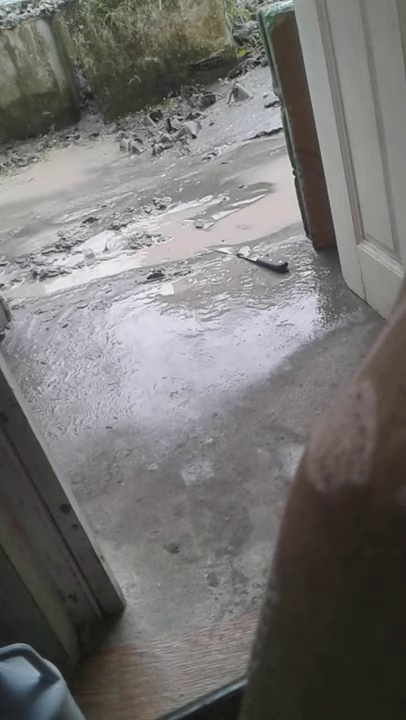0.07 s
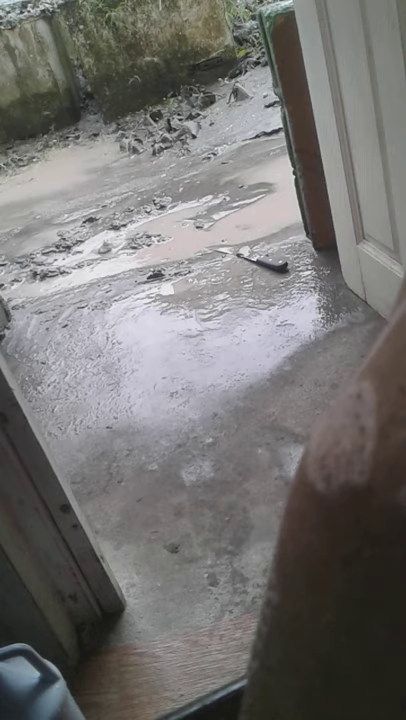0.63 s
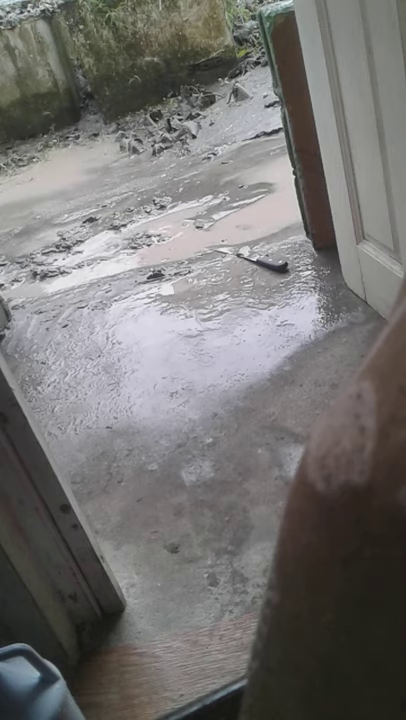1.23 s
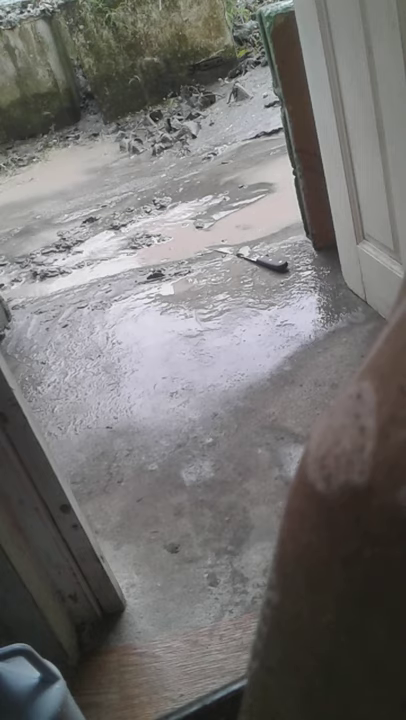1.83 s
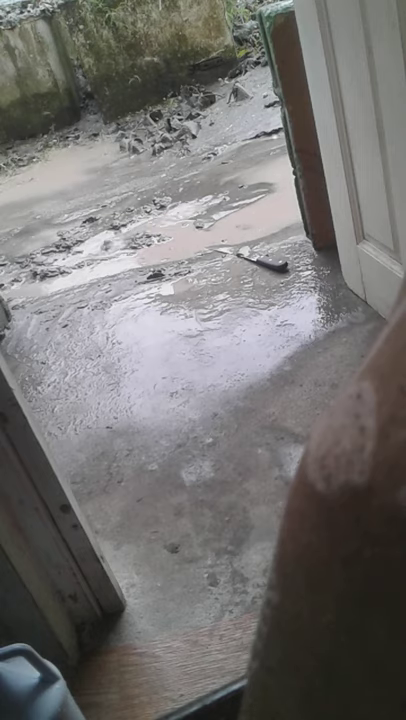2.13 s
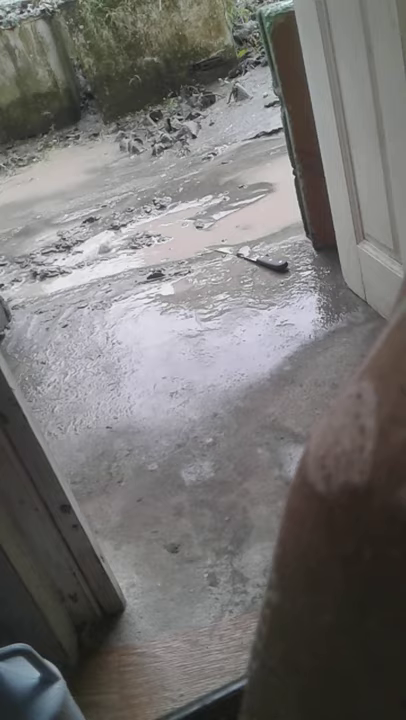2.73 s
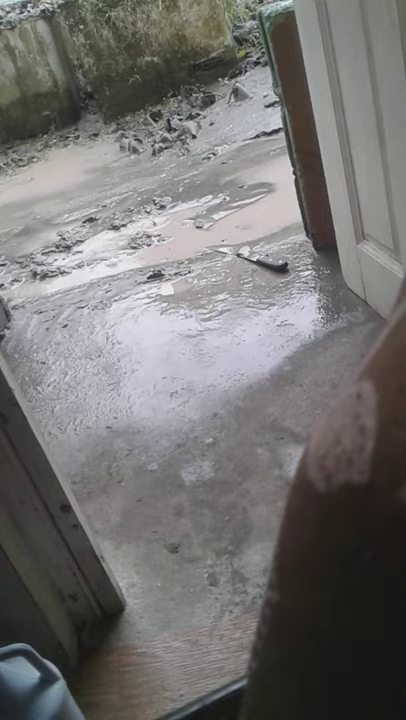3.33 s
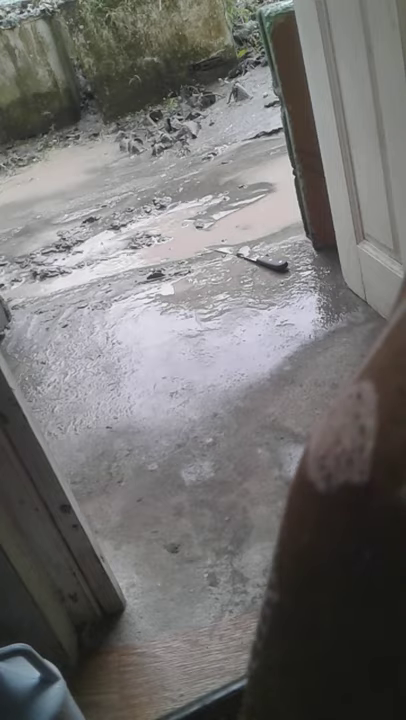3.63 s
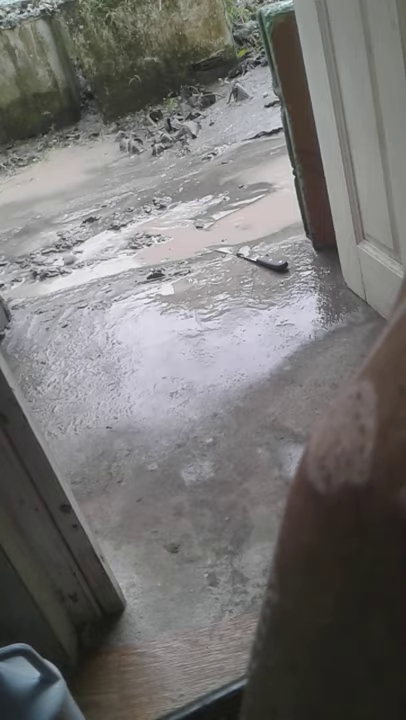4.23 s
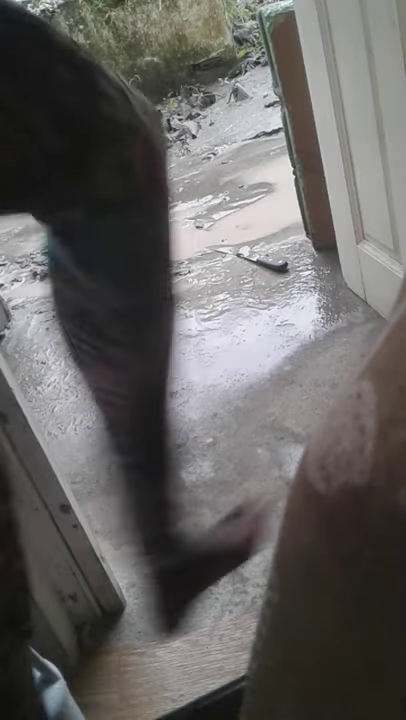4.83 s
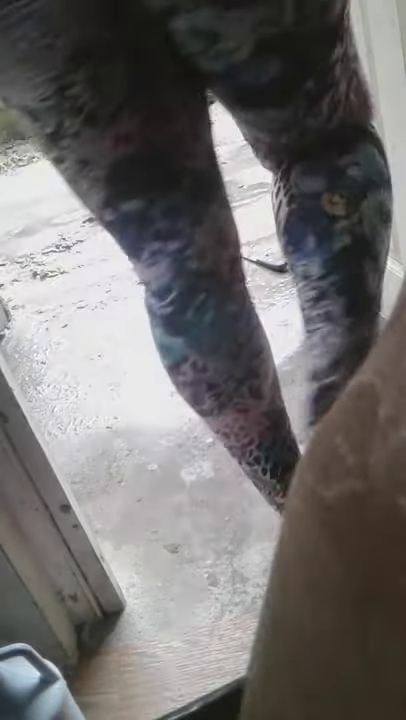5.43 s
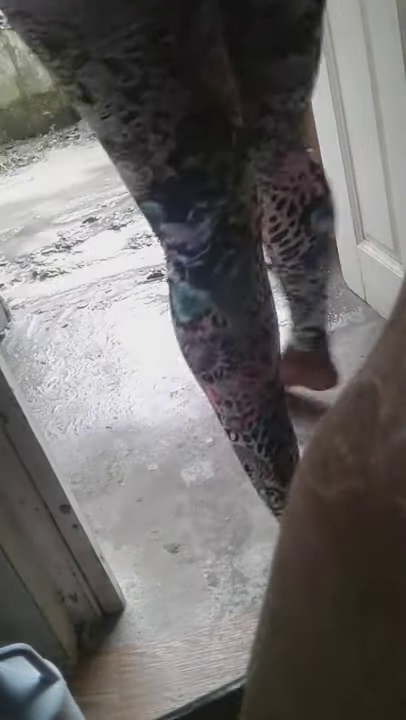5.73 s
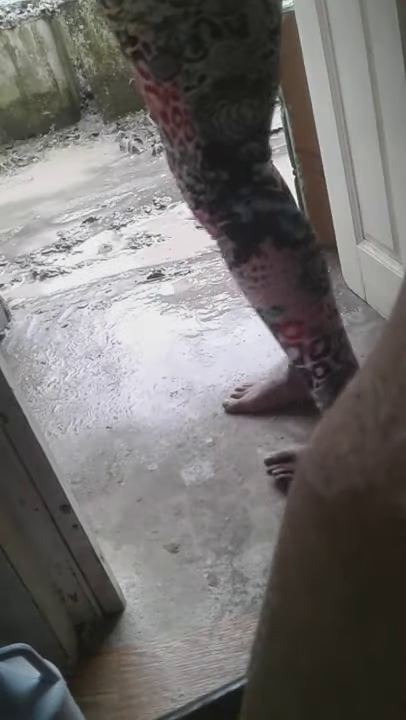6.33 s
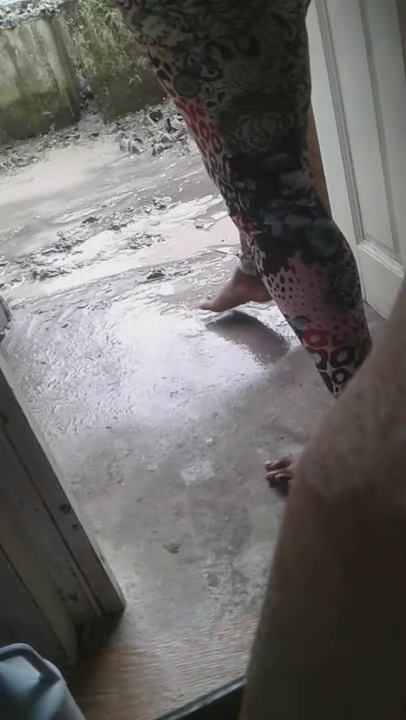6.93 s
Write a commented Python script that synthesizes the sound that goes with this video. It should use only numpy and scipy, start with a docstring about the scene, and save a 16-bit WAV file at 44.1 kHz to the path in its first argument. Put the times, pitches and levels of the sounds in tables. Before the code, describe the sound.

A quiet outdoor rumble and thin hiss drift into a small wooden-floored room through an open door. After a light, dry tick, two dull footsteps land on the boards, the second louder and joined by another tick, each briefly booming in the room. Faint barefoot pats and soft scuffs of cloth follow as the walker passes. The single microphone's hiss swells slightly with the thumps.

```python
"""Two footfalls by an open door

A small wooden-floored room, one microphone, the door open on a wet yard: outdoor rumble and thin hiss.
Two dull steps land heel then sole; the boards ring and the room booms briefly. The walker pads on
barefoot into the doorway, screening the yard. In the room, light ticks and soft scuffs and rustles;
far off, faint tones. The recorder's noise suppressor lets the hiss up while the thumps last."""
import sys
import numpy as np
from scipy import signal
from scipy.fft import rfft, irfft, next_fast_len
from scipy.io import wavfile
from scipy.ndimage import uniform_filter1d

SR = 44100
rng = np.random.default_rng(int(sys.argv[2]) if len(sys.argv) > 2 else 0)


def to_wav(s):
    """Save 16-bit WAV."""
    ch = np.atleast_2d(s).T  # columns
    pcm = np.round(np.clip(ch, -1, 1) * 32767)  # PCM
    wavfile.write(sys.argv[1], SR, pcm.astype(np.int16))


N = 317079

# Colour of the yard's rumble and the microphone's hiss: frequency_hz, relative_density_db
AIR_SPECTRUM = [(25, -24), (34, -24.5), (45, -11.5), (62, -2), (140, -1), (260, -5.5), (410, -10),
                (660, -12.5), (1000, -16.5), (2000, -24.5), (3200, -32), (5000, -39), (7500, -35.5),
                (15500, -35.5)]
# Skin and cloth brushing by: peak_s, level_db, centre_hz, fall_s
SCUFF_STROKES = [(.12, -77, 1300, 0.018), (.53, -82, 3280, 0.052), (.572, -69, 1010, .055),
                 (.645, -72, 1180, .05), (1.29, -79, 1330, 0.026), (2.953, -69.5, 760, 0.021),
                 (3.48, -76, 1100, 0.035), (4.66, -71, 920, 0.097), (5.09, -68.5, 600, 0.055),
                 (5.33, -75, 960, 0.13), (5.485, -66.5, 730, 0.067), (5.709, -76, 885, 0.057)]
# Slow rustles and low swells: peak_s, level_db, centre_hz, fall_s
RUSTLE_STROKES = [(.27, -83, 1800, .08), (.72, -71.5, 64.7, 0.2), (1.52, -81.5, 1500, .17),
                  (2.3, -74, 70.5, .2), (3.8, -83.5, 2750, 0.067), (6.29, -75.5, 357, .08),
                  (6.85, -85, 2000, 0.23)]
# Faint tones, far off: start_s, level_db, pitch_hz, hold_s
FAR_TONES = [(1.386, -83, 2560, .012), (2.399, -71.5, 950, 0.028), (4.021, -74, 1290, 0.048),
             (4.63, -72, 1270, 0.12), (5.28, -77, 1190, 0.099)]
# Light, dry ticks in the room: start_s, level_db, pitch_ratio, relative_echo_db
TICK_HITS = [(1.833, -74, 1.6, 0), (2.9735, -46, 1.02, -7.5), (4.2985, -43.5, 1.02, -7)]
# What a tick rings with at a pitch ratio of 1: pitch_hz, relative_db
TICK_PARTIALS = [(1400, -12), (2350, -1), (3300, -5.5)]
# How long the small room takes to die away: frequency_hz, t60_s
ROOM_DECAY = [(70, 0.64), (160, 0.37), (300, 0.37), (700, 0.41), (1300, 0.39), (3000, 0.5), (8000, 0.26)]
# Heavy steps, each at a place between spots 0 and 1 on the floor:
# start_s, place, thud_hz, thud_db, ring_gain_db, boom_gain_db, sole_delay_s, sole_gain_db
HEAVY_STEPS = [(3.7209, 0.02, 505, -44, -2.5, -2, .0085, -5.5), (4.3362, 0.98, 751, -33, -2, -1, .0312, -2)]
# Partials of the heel's thud: pitch_ratio, relative_db, peak_s
HEEL_PARTIALS = [(0.432, 4, 0.013), (1, -2.5, 0.011), (2.45, -14.5, .012)]
# Modes of the floorboards: pitch_hz, spot_0_db, spot_1_db, t60_s
FLOOR_MODES = [(70.4, -62, -54.5, 0.62), (143.3, -55.5, -45.5, 0.42), (169.5, -47, -60, 0.32),
               (196.5, -58.5, -48, 0.92), (226.7, -47.5, -47, 0.58), (259, -42.5, -46, 0.19),
               (288, -45, -31, 0.17), (319.6, -50.5, -45, 0.25), (358.7, -54, -44, 0.41),
               (412.2, -59, -39.5, 0.27), (517, -36, -39.5, 0.14), (550, -48.5, -45.5, 0.42),
               (616, -45, -36.5, 0.41), (686, -60, -35.5, 0.15), (758, -47, -57, 0.35),
               (784, -52, -42, 0.19), (864, -45.5, -44, 0.42), (935, -54, -49.5, .3),
               (1162, -54.5, -40, 0.44), (1213, -66, -45, 0.32), (1276, -64.5, -44, 0.17),
               (1274, -63.5, -45.5, 0.31), (1820, -72, -57.5, 0.21)]
# Colour of the room's boom: frequency_hz, spot_0_relative_db, spot_1_relative_db
BOOM_SPECTRUM = [(29.8, -27, -47), (64.6, -8, -12.5), (110, -7, -13), (210, -0.5, -4), (337, 0.5, 4.5),
                 (445, 2.5, -9.5), (730, 3, 4.5), (1040, -4, -8), (1243, -9, 2), (1500, -15.5, -11),
                 (1907, -22, -16.5), (2490, -30, -32), (3740, -46, -37), (5960, -53, -51.5),
                 (12100, -60, -73)]
# Bare feet on the way to the door: start_s, knock_db, thump_db
BAREFOOT_PATS = [(4.841, -66.5, -81), (5.119, -58.5, -62.5), (5.155, -64.5, -63.5), (6.341, -85, -66.5)]


def amp(db):
    """Decibels to gain."""
    return 10 ** (np.asarray(db) / 20)


def curve_at(points, hz):
    """Interpolates a table on a log-frequency axis."""
    table_hz, values = np.transpose(points)
    return np.interp(np.log(hz + 1), np.log(table_hz), values)


def add(mix, start_s, sound):
    """Mixes a sound in at start_s, dropping what falls outside the mix."""
    at = round(start_s * SR)
    sound = sound[max(-at, 0):]
    part = mix[max(at, 0):][:len(sound)]
    part += sound[:len(part)]


def noise(size, colour):
    """Noise of rms 1; colour gives the gain at each frequency."""
    spectrum = rfft(rng.standard_normal(size)) * colour(np.fft.rfftfreq(size, 1 / SR))
    coloured = irfft(spectrum, size)
    return coloured / np.sqrt(np.mean(coloured ** 2) + 1e-20)


def band(centre_hz, octaves):
    """A colour for noise: a bell on a log-frequency axis."""
    return lambda hz: np.exp(-0.5 * (np.log2((hz + 1) / centre_hz) / octaves) ** 2)


def stroke(t, rise_s, fall_s):
    """An envelope that swells to its peak at t = 0, then dies away."""
    return np.exp(-(np.minimum(t, 0) / rise_s) ** 2 - np.maximum(t, 0) / fall_s)


def fade_in(t, centre_s, width_s):
    """A smooth step from 0 to 1."""
    return (1 + np.tanh((t - centre_s) / width_s)) / 2


def rumble_and_hiss():
    """Yard rumble over microphone hiss; the mids swell as the walker passes, then the body screens them."""
    t = np.arange(N) / SR
    air_db, open_db, blocked_db, passing_db = -68.5, 0.16, -2, 3.5
    pass_s, pass_width_s = 4.66, 0.43
    air = amp(air_db) * noise(next_fast_len(N), lambda hz: amp(curve_at(AIR_SPECTRUM, hz)))[:N]
    mids = signal.sosfiltfilt(signal.butter(1, [250, 2800], "bandpass", fs=SR, output="sos"), air)
    treble = signal.sosfiltfilt(signal.butter(2, 6000, "highpass", fs=SR, output="sos"), air)
    passing = np.exp(-((t - pass_s) / pass_width_s) ** 2)
    blocked = fade_in(t, centre_s=5.7, width_s=0.31)  # the walker fills the doorway
    mid_gain = amp(open_db * (1 - blocked) + blocked_db * blocked + passing_db * passing)
    treble_gain = amp(2.3 * fade_in(t, centre_s=6.9, width_s=0.11))  # the hiss lifts near the end
    return air + (mid_gain - 1) * mids + (treble_gain - 1) * treble


def brushes(strokes, octaves):
    """Swells of noise: narrow where skin or cloth scuffs by, broad for rustles and low swells."""
    lead_s = 0.5
    out, t = np.zeros(N), np.arange(2 * SR) / SR - lead_s
    for peak_s, level_db, centre_hz, fall_s in strokes:
        swell = stroke(t, rise_s=0.62 * fall_s, fall_s=fall_s)
        add(out, peak_s - lead_s, amp(level_db) * swell * noise(len(t), band(centre_hz, octaves)))
    return out


def far_tones():
    """Brief tones, smeared by distance into narrow bands of noise."""
    out, t = np.zeros(N), np.arange(SR) / SR
    rise_s, fall_s = 0.002, 0.012
    for start_s, level_db, pitch_hz, hold_s in FAR_TONES:
        held = (1 - np.exp(-t / rise_s)) * np.exp(-np.maximum(t - hold_s, 0) / fall_s)
        add(out, start_s, amp(level_db) * held * noise(SR, band(pitch_hz, octaves=0.056)))
    return out


def room_tail(colour, rise_s=0.0026):
    """Dense reflections reach the microphone, each band dying at its own speed."""
    hz, frame_s, spectra = signal.stft(noise(SR, colour), SR, nperseg=512)
    decay = amp(-60 * frame_s / curve_at(ROOM_DECAY, hz)[:, None])
    tail = signal.istft(spectra * decay, SR, nperseg=512)[1][:SR]
    return tail * (1 - np.exp(-np.arange(SR) / SR / rise_s))


def ticks():
    """A small hard thing rings for a few cycles; near reflections follow, then a thin room tail."""
    out, t = np.zeros(N), np.arange(SR) / SR
    rise_s, fall_s = 0.0004, 0.0011
    near_db, near_fall_s, far_db = -13, 0.01, -20
    struck = np.exp(-t / fall_s) * (1 - np.exp(-t / rise_s))
    near_and_far = amp(near_db) * np.exp(-t / near_fall_s) + amp(far_db)
    for start_s, level_db, pitch_ratio, echo_db in TICK_HITS:
        ring = sum(amp(db) * np.sin(2 * np.pi * pitch_ratio * hz * t) for hz, db in TICK_PARTIALS)
        echo = near_and_far * room_tail(band(pitch_ratio * 2250, octaves=0.72))
        add(out, start_s, amp(level_db) * (struck * ring + amp(echo_db) * echo))
    return out


def thud(t, hz, peak_s):
    """The board under the foot gives and springs back in a short burst."""
    press = t / peak_s
    return press ** 2 * np.exp(1 - press ** 2) * np.sin(2 * np.pi * hz * t)


def board_ring(t, place, rise_s=0.0018):
    """The floor rings in its modes; where the foot lands sets the strength of each."""
    ring = np.zeros(len(t))
    for k, (hz, spot_0_db, spot_1_db, t60_s) in enumerate(FLOOR_MODES):
        level_db = np.interp(place, [0, 1], [spot_0_db, spot_1_db])
        ring += (-1) ** k * amp(level_db - 60 * t / t60_s) * np.sin(2 * np.pi * hz * t)
    return ring * (1 - np.exp(-t / rise_s))  # the heavy floor takes a moment to move


def room_boom(place):
    """A step fills the small room; where it lands sets the boom's colour and level."""
    spectrum = [(hz, np.interp(place, [0, 1], spots_db)) for hz, *spots_db in BOOM_SPECTRUM]
    level_db = np.interp(place, [0, 1], [-41, -34])
    return amp(level_db) * room_tail(lambda hz: amp(curve_at(spectrum, hz)))


def footfalls():
    """Heel, then sole: each thuds, rings the boards and sets the room booming."""
    out, t = np.zeros(N), np.arange(SR) / SR
    for start_s, place, thud_hz, thud_db, ring_db, boom_db, sole_delay_s, sole_db in HEAVY_STEPS:
        ring = amp(ring_db) * board_ring(t, place)
        knock = sum(amp(db) * thud(t, ratio * thud_hz, peak_s) for ratio, db, peak_s in HEEL_PARTIALS)
        heel = amp(thud_db) * knock + ring + amp(boom_db) * room_boom(place)
        add(out, start_s, heel)
        # The heel carries the weight; the sole slaps higher and rings the boards far less.
        slap = thud(t, 1.66 * thud_hz, peak_s=0.0077)
        sole = amp(thud_db - 1) * slap + amp(-18) * ring + amp(boom_db - 2) * room_boom(place)
        add(out, start_s + sole_delay_s, amp(sole_db) * sole)
    return out


def barefoot_pats():
    """A bare foot set down lightly: a small hollow knock over a low thump."""
    rise_s = 0.0034
    out, t = np.zeros(N), np.arange(SR) / SR - rise_s
    for start_s, knock_db, thump_db in BAREFOOT_PATS:
        knock = stroke(t, rise_s, fall_s=0.02) * noise(SR, band(centre_hz=597, octaves=0.17))
        thump = stroke(t, rise_s, fall_s=0.026) * noise(SR, band(centre_hz=175, octaves=0.8))
        add(out, start_s, amp(knock_db) * knock + amp(thump_db) * thump)
    return out


def scene():
    """The room and the yard beyond its door, at one microphone."""
    mix = rumble_and_hiss() + footfalls() + ticks() + barefoot_pats()
    mix += brushes(SCUFF_STROKES, octaves=0.33) + brushes(RUSTLE_STROKES, octaves=0.6)
    mix += far_tones()
    return mix[None]


def noise_suppressor(x, threshold_db, lift_db, knee_db, lag_s):
    """The gain opens gradually on loud sounds, hiss and all, and closes again on their tails."""
    level_db = 10 * np.log10(abs(uniform_filter1d(x ** 2, size=512)) + 1e-12)
    wanted = (1 + np.tanh((level_db - threshold_db) / knee_db)) / 2
    pole = np.exp(-1 / (lag_s * SR))
    opening = signal.lfilter([1 - pole], [1, -pole], wanted)
    return x * amp(lift_db * opening)


def record(dry):
    """The recorder: noise suppression, a band limit and the converter's small steady offset."""
    edge_hz, offset = 15800, -0.0005
    gated = noise_suppressor(dry[0], threshold_db=-58.5, lift_db=9.5, knee_db=4, lag_s=0.044)
    lowpass = signal.firwin(511, edge_hz, window=("kaiser", 9), fs=SR)
    return signal.oaconvolve(gated, lowpass, "same")[None] + offset


dry = scene()
out = record(dry)
to_wav(out)
```